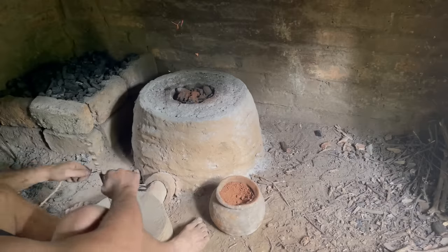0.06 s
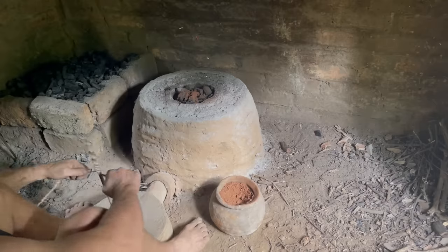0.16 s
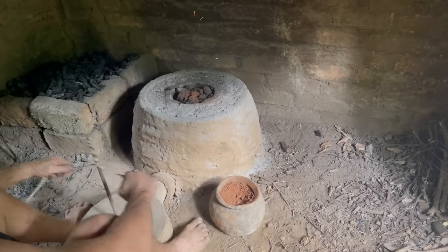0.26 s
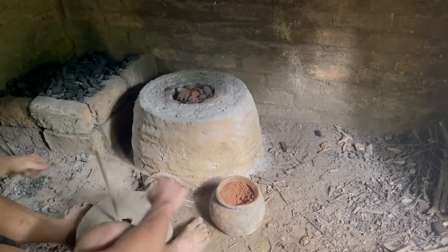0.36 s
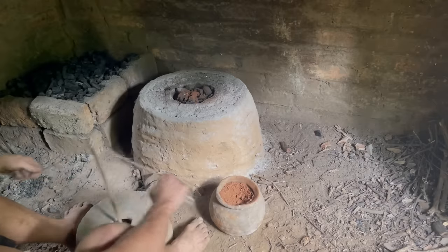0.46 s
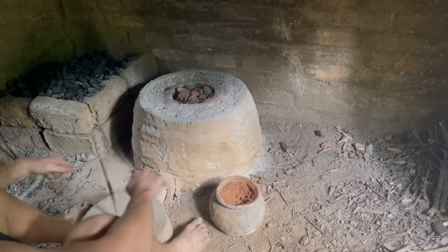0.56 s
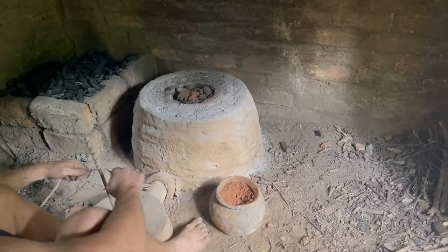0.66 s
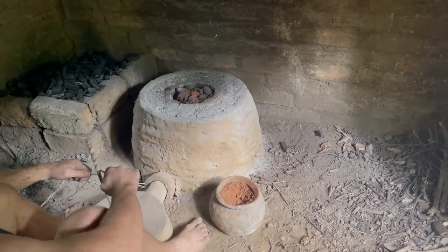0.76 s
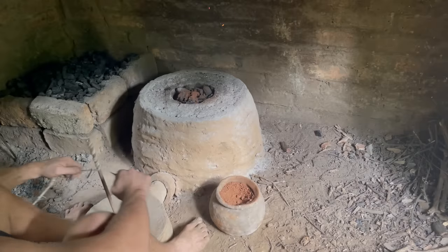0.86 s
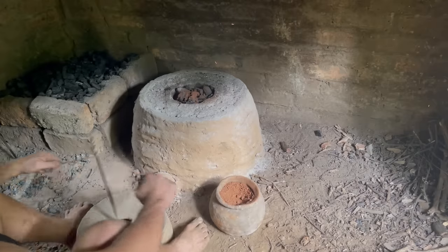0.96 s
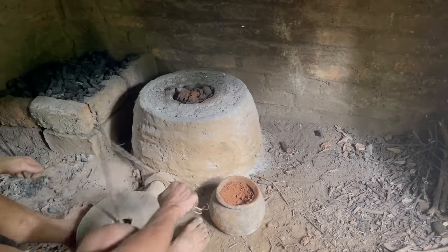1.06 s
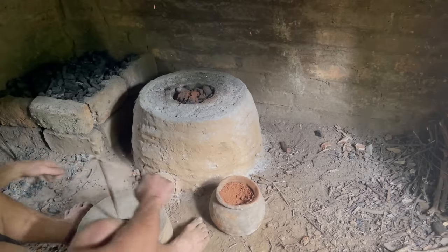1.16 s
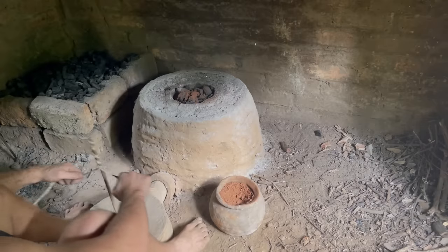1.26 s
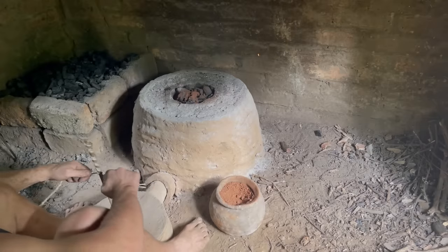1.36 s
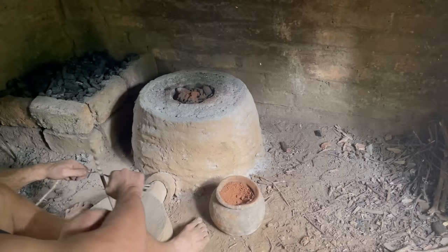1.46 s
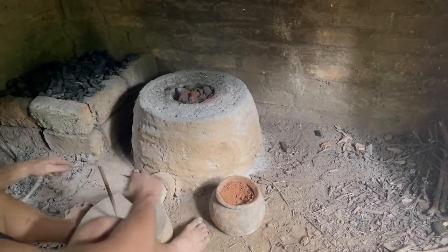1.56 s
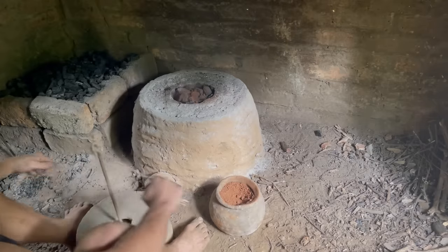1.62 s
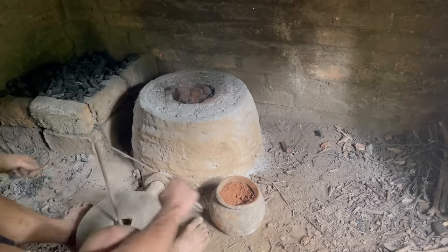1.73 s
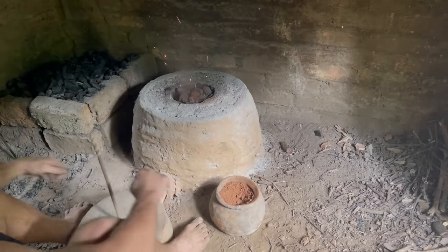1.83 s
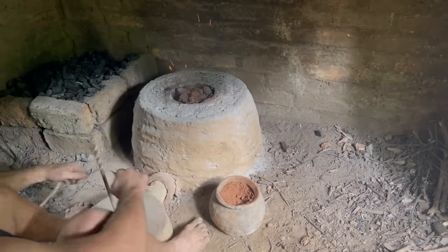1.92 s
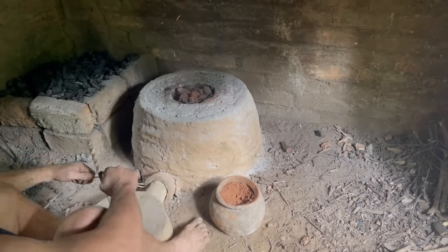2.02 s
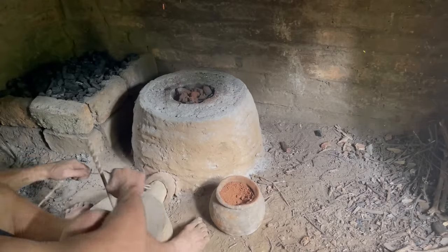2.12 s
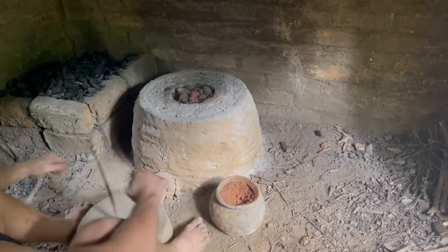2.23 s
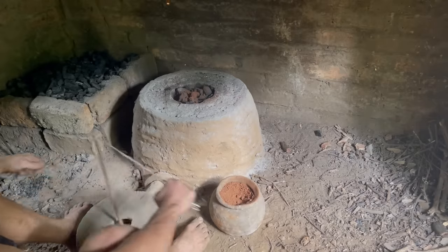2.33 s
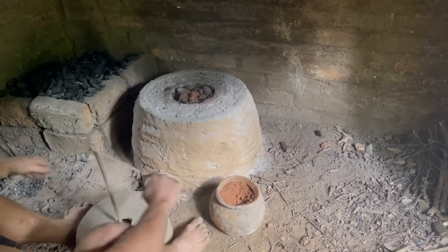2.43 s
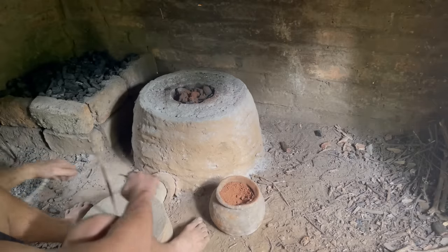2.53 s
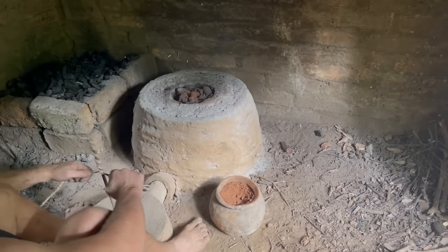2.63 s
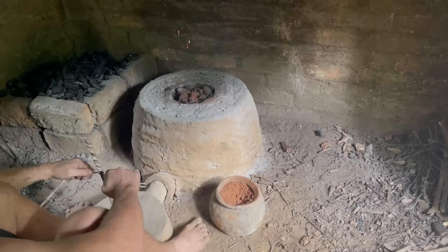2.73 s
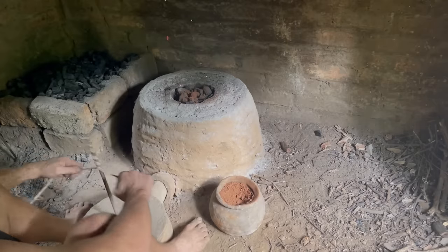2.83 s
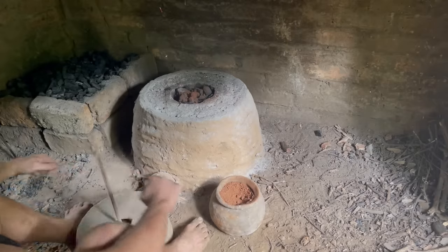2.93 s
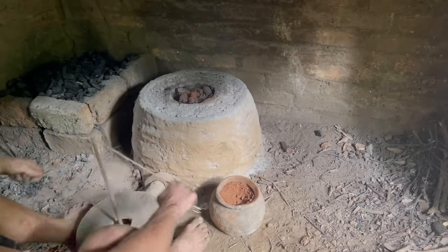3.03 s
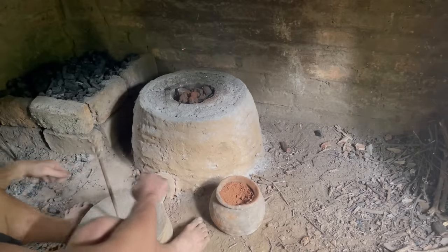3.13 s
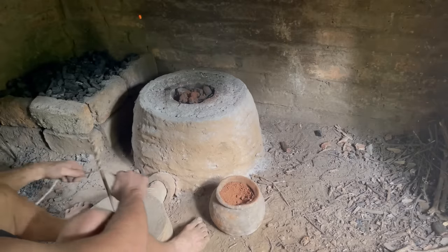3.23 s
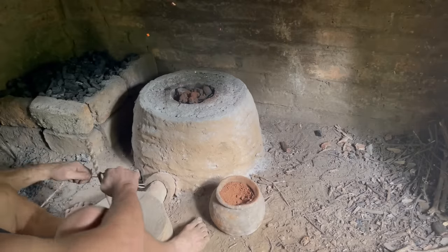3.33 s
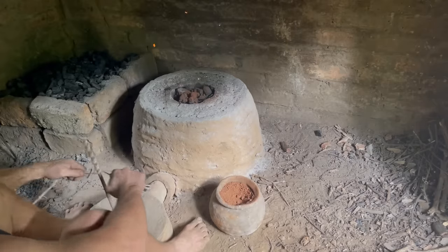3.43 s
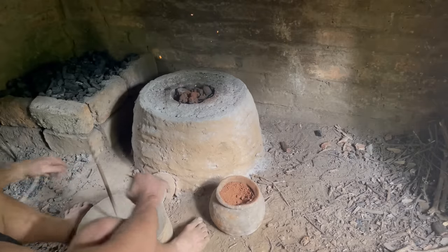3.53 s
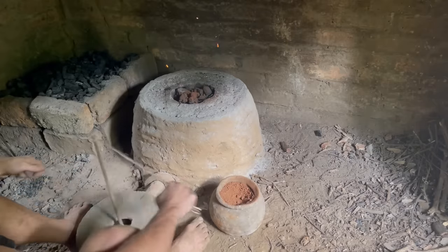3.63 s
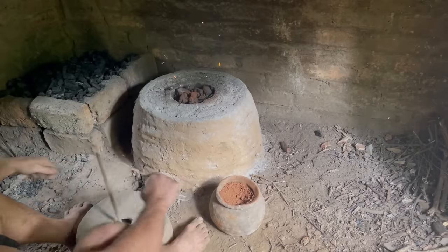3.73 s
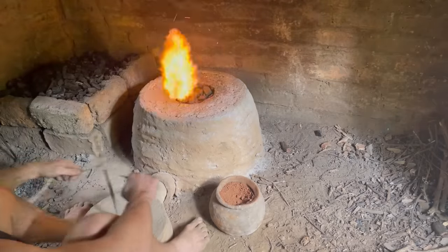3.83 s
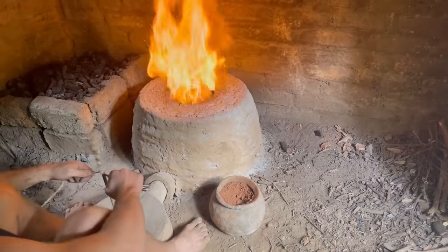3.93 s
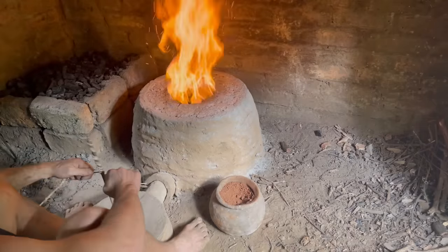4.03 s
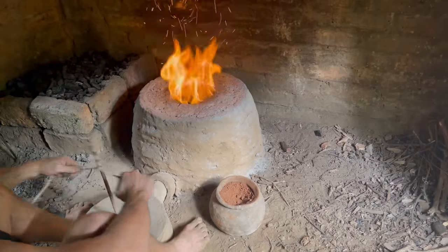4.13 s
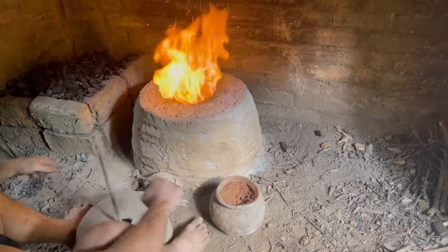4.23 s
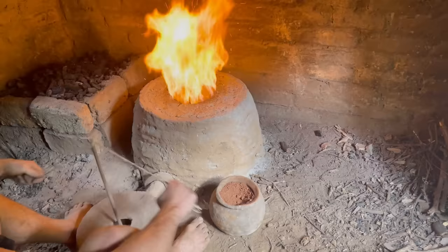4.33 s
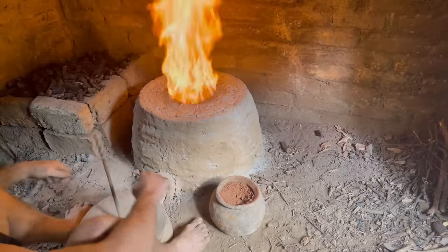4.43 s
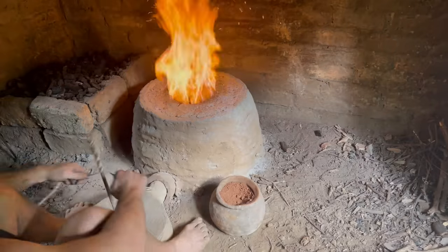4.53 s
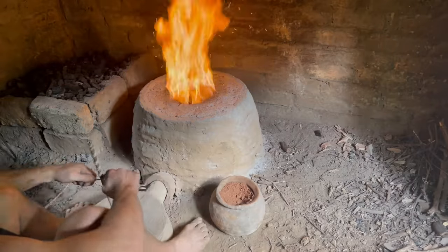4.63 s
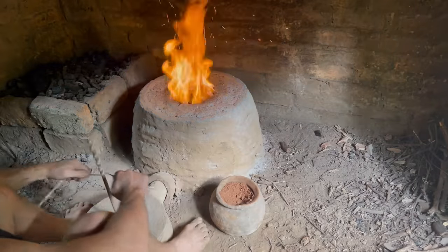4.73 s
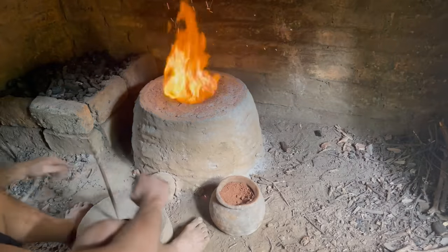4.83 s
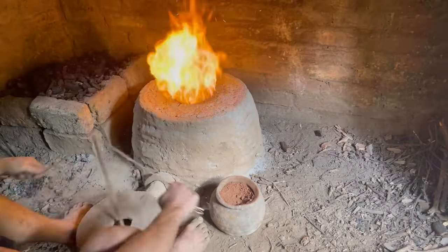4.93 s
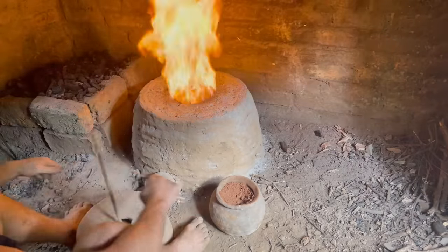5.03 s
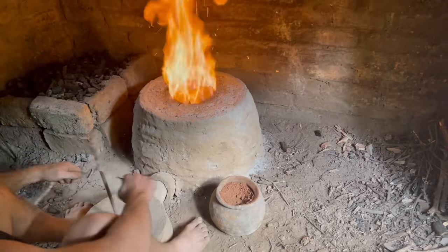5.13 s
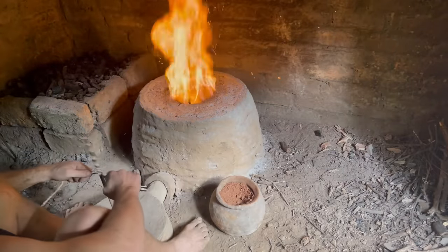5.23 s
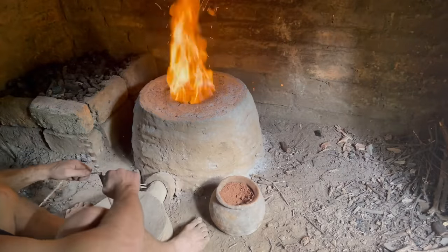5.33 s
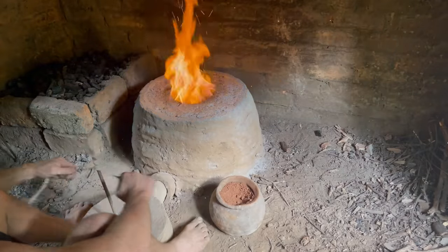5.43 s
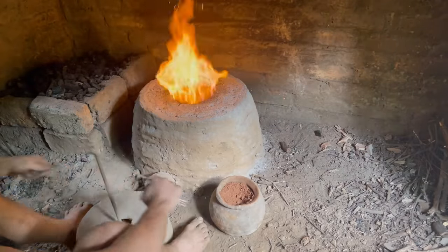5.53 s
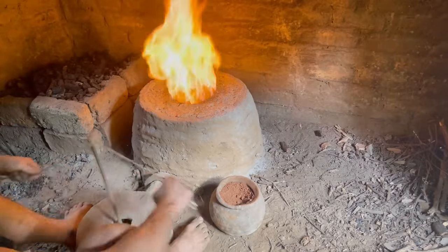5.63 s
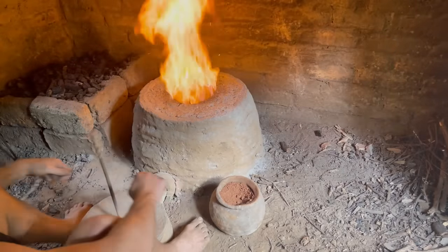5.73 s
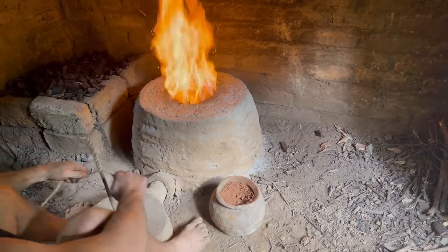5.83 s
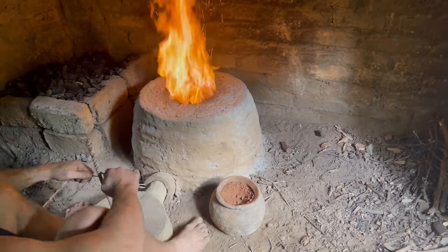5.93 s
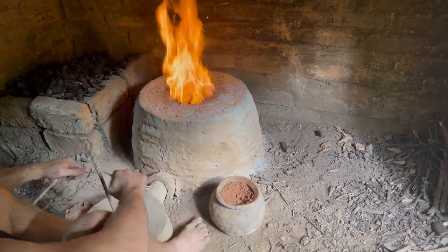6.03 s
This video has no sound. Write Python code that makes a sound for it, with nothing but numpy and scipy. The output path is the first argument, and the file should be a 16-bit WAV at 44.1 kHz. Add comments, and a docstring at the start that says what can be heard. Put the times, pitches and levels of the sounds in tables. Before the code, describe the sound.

Steady pumping of air through a hot coal bed: whoosh, fade, click, whoosh again. The low end hums and booms in the furnace hollow, the middle roars with turbulence, and the top hisses with tiny sparks crackling. Short muffled puffs and bright coal ticks fall irregularly, and a few faint airy whistles glide by. Recorded nearby in stereo inside a small hut, with a very quiet hush in the gaps.

```python
"""A low boom and a roar die away as a blower stroke ends, then stroke follows stroke.
A cord-driven blower feeds a charcoal furnace in a brick hut, a metre or two from the microphone.
Shaped noise booms in the furnace, roars through the coal and hisses at the nozzle; short filtered bursts
make the clicks of the valve flap, the puffs of gas and the ticks of the coals. Gliding bands of noise
whistle faintly, and a steady, faint outdoor hush stays between the strokes."""
import sys
import numpy as np
from scipy import signal
from scipy.fft import rfft, irfft, next_fast_len
from scipy.io import wavfile
from scipy.ndimage import uniform_filter1d

SR = 44100
rng = np.random.default_rng(int(sys.argv[2]) if len(sys.argv) > 2 else 0)


def dump_mix(stems):
    """Bounce the given channels to the path in sys.argv[1] as a 16-bit WAV at rate SR."""
    frames = np.atleast_2d(stems).T  # one column per channel
    limited = np.clip(frames, -1, 1)  # hard clip at full scale
    pcm = np.round(limited * 32767).astype(np.int16)
    wavfile.write(sys.argv[1], SR, pcm)


N = 267554  # samples, about 6.07 s


def undb(db):
    """Decibels to an amplitude factor."""
    return 10 ** (np.asarray(db) / 20)


def unit(x):
    """Scale to an RMS of 1 over all channels."""
    return x / np.sqrt(np.mean(x ** 2))


def over_hz(table):
    """A (Hz, value) table read at every FFT bin, straight on a log axis."""
    hz, value = np.transpose(table)
    bins_hz = np.arange(N // 2 + 1) * SR / N
    return np.interp(np.log(bins_hz + 1), np.log(hz + 1), value)


def resonances(modes):
    """Gain at every FFT bin of broad resonances driven by unrelated eddies, each with steep skirts."""
    f = np.arange(N // 2 + 1) * SR / N + 1  # the 1 keeps the division below finite
    power = 0
    for hz, width, db in modes:
        detuning = (f - hz * hz / f) / width
        power = power + undb(db) ** 2 / (1 + detuning ** 2) ** 2
    return np.sqrt(power)


def walk(rate):
    """A wandering level: random steps held 1 / rate s, then smoothed twice over the same time."""
    hold = int(SR / rate)
    steps = np.repeat(rng.standard_normal(N // hold + 1), hold)
    return 0.9 * uniform_filter1d(uniform_filter1d(steps, hold), hold)[:N]


def air(gain):
    """Stereo noise of a given colour: a shared and an opposed part set how alike the two sides are."""
    # Each row: frequency in Hz, left-right likeness from 0 to 1.
    likeness = [(40, .999), (90, 1), (130, 0.91), (260, 0.45), (600, 1), (950, 0.2), (1300, 0.74),
                (1650, 0.5), (3000, 0.72), (7000, 0.52), (8600, 1), (10300, 1), (12500, 0.6)]
    like = np.clip(over_hz(likeness), 0, 1)
    mid, side = (rfft(rng.standard_normal(N)) * gain for _ in range(2))
    opposed = side * np.sqrt(1 - like) * np.array([[1], [-1]])
    return unit(irfft(mid * np.sqrt(1 + like) + opposed, N))


def even(x, depth):
    """Soften the chance swells of a narrow noise by dividing by a power of its envelope."""
    envelope = np.abs(signal.hilbert(x.mean(axis=0), next_fast_len(N)))[:N]
    return unit(x / (envelope + 0.37) ** depth)


def ring(hz, t60, size):
    """A decaying sine, as one mode of a struck body; t60 in seconds."""
    t = np.arange(size) / SR
    return np.sin(2 * np.pi * hz * t) * undb(-60 * t / t60)


def burst(hz, width, t60, tail_db, order=2, size=4000):
    """A sharp crack with two early echoes and the noisy tail that the walls return, in one band; peak 1."""
    t = np.arange(size) / SR
    one, left, right = rng.standard_normal((3, size))
    tail = (one + 0.55 * np.array([left, right])) * undb(tail_db - 60 * t / max(t60, .005))
    raw = tail * np.minimum(t / 0.00065, 1)  # the tail fades in over 0.65 ms
    raw[:, [30, 42, 70]] += [1, -.8, .5]  # crack, then echoes 12 and 40 samples later
    edges = np.clip([hz - width / 2, hz + width / 2], 200, 15000)
    band = signal.sosfilt(signal.butter(order, edges, "bandpass", fs=SR, output="sos"), raw)
    return band / np.abs(band).max()


def add(track, s, sound):
    """Mix a short sound into the track at time s."""
    i = int(s * SR)
    track[:, i:i + sound.shape[-1]] += sound[..., :N - i]


def strokes():
    """Gains of roar, upper roar, hiss, hollow tone and deep rumble: one shape, played for every stroke."""
    # Blower strokes. Each row: onset in seconds, length in seconds, then gains in dB of roar,
    # upper roar, hiss and boom.
    pulls = [(-.345, 0.66, -1.5, -1.3, 0, 3.5), (0.306, 0.62, 1, 0, -0.7, 0.5),
             (0.948, 0.64, -1, 1.5, -0.5, 1.2), (1.583, .65, 0.2, -1.2, 0.3, 0.5),
             (2.244, 0.65, -0.8, 0.4, 0.1, 1), (2.907, 0.64, 0.2, 0.1, -0.6, -0.3),
             (3.546, 0.62, 0.6, 1, 0.7, 2.1), (4.192, 0.63, 1, -0.1, -0.7, -0.6),
             (4.836, 0.64, 0.2, 0, 0.1, 0.8), (5.49, 0.65, -0.2, -0.4, -0.7, -2.4),
             (6.17, .65, 0.1, 0.1, 6.5, -6)]
    # Rise, hold and decay of a stroke ahead of its own gains. Each row: time from onset in stroke lengths,
    # then levels in dB of roar, upper roar, hiss, hollow tone and deep rumble.
    stroke_shape = [(-.3, -88, -95, -83, -60, -60), (-.12, -62.5, -73, -62, -65, -52),
                    (-.04, -50.5, -66, -58, -39.5, -52), (0.029, -40, -48, -52.5, -27, -28.5),
                    (0.172, -33.5, -43, -48, -24, -38), (.38, -36, -46, -56, -25, -36),
                    (.6, -44, -55.5, -66, -28.5, -35), (.72, -51, -61.5, -72, -32, -37),
                    (.85, -65, -75.5, -72, -37.5, -38.5), (1.05, -90, -95, -90, -44, -64)]
    t = np.arange(N) / SR
    at, *shape = np.transpose(stroke_shape)
    power = 0
    for s, length, roar_db, upper_db, hiss_db, boom_db in pulls:
        db = [np.interp((t - s) / length, at, level, left=-120, right=-120) for level in shape]
        gains_db = np.array([[roar_db, upper_db, hiss_db, boom_db, boom_db]]).T
        power = power + undb(np.array(db) + gains_db) ** 2
    return np.sqrt(power)


def boom(tone_flow, deep_flow):
    """The furnace hollow hums over a deeper rumble, as resonant noise; their levels shift now and then."""
    # Furnace hollow and deep rumble. Each row: resonance in Hz, width in Hz, relative level in dB.
    hollow = [(71.2, 24, -6.5), (86.2, 16.2, 2.5), (128.6, 53.4, -9), (187.5, 36, -14)]
    rumble = [(49.5, 23.5, 0)]
    # Swells of the boom. Each row: centre in seconds, spread (sigma) in seconds, hollow tone rise in dB,
    # deep rumble rise in dB (a fall where negative).
    swells = [(0.093, 0.047, 1, -9), (0.48, 0.024, 4, -13), (0.644, 0.03, 3, 5), (1.068, 0.023, 4.5, -3),
              (1.194, 0.027, 6.5, 2), (1.708, 0.042, 3.5, -1), (1.83, 0.029, 4.5, -5),
              (1.934, 0.023, 2.5, -4), (2.442, 0.021, 7, 4), (2.668, 0.034, 5, 6), (3.0, 0.021, 4.5, 4),
              (3.148, 0.038, 7, 3), (3.83, 0.054, 5.5, 3), (3.911, 0.028, 1.5, 20.5), (4.485, 0.03, 7.5, 5),
              (5.004, 0.036, 4, 4), (5.623, 0.026, 6.5, 10.5), (5.851, .04, 8, 7)]
    t = np.arange(N) / SR
    tone_db, deep_db = 0, 0
    for s, spread, tone_rise, deep_rise in swells:
        bump = np.exp(-.5 * ((t - s) / spread) ** 2)
        tone_db = tone_db + tone_rise * bump
        deep_db = deep_db + deep_rise * bump
    tone = even(air(resonances(hollow)), 0.15) * tone_flow * undb(tone_db)
    deep = even(air(resonances(rumble)), 0.31) * deep_flow * undb(deep_db)
    return tone + deep


def roar(roar_flow, upper_flow, gust):
    """Air roars through coal bed and pipe: noise in their resonances, shaken in level by turbulence."""
    # Coal bed and pipe, low and upper. Each row: resonance in Hz, width in Hz, relative level in dB.
    pipe = [(207.4, 79, 3.5), (380, 210, -2), (592, 247, -1)]
    upper_pipe = [(887, 135, 1), (1106, 196, 1.5), (1278, 70, 5.5), (1483, 254, -1.5), (1846, 760, -8.5),
                  (2310, 270, -13), (2860, 680, -14)]
    low = air(resonances(pipe)) * roar_flow * undb(1.8 * gust + 1.4 * walk(70))
    upper = air(resonances(upper_pipe)) * upper_flow * undb(1.1 * gust + 1.14 * walk(50))
    return low + upper


def hiss(flow, gust):
    """The jet at the nozzle hisses: coloured noise that follows the flow and its gusts."""
    # Colour of the hiss. Each row: frequency in Hz, relative level in dB per Hz.
    jet_colour = [(1500, 1.5), (2500, -2), (4000, -0.5), (6300, -2.5), (8500, 2), (10300, 0.5), (11200, 6),
                  (12000, -9), (13000, -28)]
    colour = undb(over_hz([(600, -38)] + jet_colour))
    return air(colour) * flow * undb(1.5 * gust + 1.95 * walk(35))


def crackle(flow):
    """The draught makes the coals crackle faintly: random sparks, in step with the hiss."""
    struck = rng.random(N) < 50 / SR  # about 50 a second
    strength = undb(3.5 + 2.0 * rng.exponential(size=N)) * rng.standard_normal(N)
    sparks = struck * flow * strength
    snap = burst(8700, 5100, 0.049, tail_db=-9.0, size=900)
    return signal.fftconvolve(sparks[None], snap, axes=1)[:, :N]


def puffs():
    """Sudden puffs of gas in the coal bed: short bursts of low-pitched noise."""
    # Each row: start in seconds, peak in dB, centre in Hz, tail t60 in seconds.
    gas_puffs = [(0.418, -22, 684, 0.16), (0.586, -26, 423, 0.089), (1.109, -23, 446, 0.098),
                 (1.704, -20.5, 620, 0.11), (1.799, -30, 437, 0.026), (1.825, -25.5, 611, 0.21),
                 (2.469, -29, 573, 0.068), (3.06, -25, 630, 0.11), (3.132, -21.5, 620, 0.097),
                 (3.632, -31, 547, 0.15), (3.849, -23.5, 560, 0.36), (4.275, -24, 619, 0.16),
                 (4.358, -19.5, 432, 0.028), (5.567, -23.5, 580, 0.073), (5.652, -27, 638, 0.14),
                 (5.721, -23, 436, 0.12)]
    out = np.zeros((2, N))
    for s, db, hz, t60 in gas_puffs:
        add(out, s, undb(db) * burst(hz, 463, t60, tail_db=-13.5, order=3))
    return out


def blower(roar_flow, upper_flow, hiss_flow):
    """Roar, hiss and crackle follow the flow, the first two under shared gusts; puffs come on top."""
    gust = walk(24.96)
    blast = roar(roar_flow, upper_flow, gust) + hiss(hiss_flow, gust)
    return blast + crackle(hiss_flow) + puffs()


def flap():
    """Each valve flap contact cracks in the treble and knocks lower down; the knock rings short modes."""
    # Flap contacts. Each row: start in seconds, crack peak in dB, knock over crack in dB,
    # gain of the ringing in the knock in dB, tail t60 in seconds, tail gain under the crack in dB.
    contacts = [(0.104, -32.5, -5.5, -35, 0.072, -19), (0.7635, -31, -13.5, -28, 0.092, -19),
                (1.3746, -32.5, -3.5, -38, 0.11, -19), (2.0403, -27.5, -6, -36.5, 0.11, -26),
                (2.6842, -28, -11, -30.5, 0.08, -21), (3.3288, -29, -4.5, -33, 0.07, -14.5),
                (3.3447, -25, -1.5, -32.5, 0.1, -25.5), (4.6105, -31, -1.5, -37, 0.069, -17),
                (4.6154, -24.5, -20, -23, 0.079, -29), (4.6209, -27, -2, -34.5, 0.1, -22),
                (5.2806, -30.5, -5.5, -30.5, 0.09, -19.5), (5.9341, -23.5, -13, -27, 0.092, -21.5),
                (5.946, -30, 2, -35.5, 0.1, -24.5)]
    # Short ringing modes, ahead of a chance spread. Each row: frequency in Hz, level in dB, t60 in seconds.
    flap_modes = [(1888, 6, 0.049), (1978, 7, 0.06), (2833, 3, 0.05), (3530, -12, 0.033), (3756, 2, 0.078),
                  (4520, -10, 0.034), (4760, 3, 0.03), (5920, -16, 0.036)]
    out = np.zeros((2, N))
    for s, db, knock_db, ring_db, t60, tail_db in contacts:
        modes = 0
        for hz, mode_db, mode_t60 in flap_modes:
            level_chance, pitch_chance = rng.standard_normal(2)
            mode = ring(hz * (1 + 0.0094 * pitch_chance), mode_t60, size=4000)
            modes = modes + undb(mode_db + 1.1 * level_chance) * mode
        knock = burst(4380, 3270, t60, tail_db)
        rung = signal.fftconvolve(knock, modes[None], axes=1)[:, :4000]
        add(out, s, undb(db) * burst(8360, 5050, t60, tail_db))
        add(out, s, undb(db + knock_db) * (knock + undb(ring_db) * rung))
    return out


def coals():
    """The louder ticks of the coals: single wide-band cracks in the treble."""
    # Each row: start in seconds, peak in dB, centre in Hz, tail t60 in seconds.
    ticks = [(0.2766, -42, 8100, 0.048), (0.3333, -22, 9900, 0.076), (0.666, -40, 8200, 0.1),
             (0.864, -37.5, 9200, 0.086), (0.9527, -35, 8750, 0.032), (1.3184, -44, 8570, 0.044),
             (1.756, -35, 9500, 0.05), (2.193, -35.5, 7810, 0.2), (2.5887, -29, 10200, 0.064),
             (2.9158, -40, 8540, 0.04), (2.939, -29.5, 9900, 0.064), (3.4263, -45, 8600, 0.04),
             (3.925, -45, 9500, 0.04), (4.0578, -44.5, 8930, 0.078), (4.151, -44, 8600, 0.04),
             (5.5009, -38, 8050, 0.043), (5.5273, -31, 9300, 0.1), (5.7283, -38, 9200, 0.048),
             (5.8698, -37.5, 7600, 0.032)]
    out = np.zeros((2, N))
    for s, db, hz, t60 in ticks:
        add(out, s, undb(db) * burst(hz, 6000, t60, tail_db=-19))
    return out


def whistles():
    """Faint airy whistles: bands of noise around a gliding pitch, fading in and out."""
    # Each row: start in seconds, end in seconds, start pitch in Hz, end pitch in Hz, rough width in Hz,
    # level in dB ahead of the fades.
    glides = [(2.064, 2.135, 1950, 1610, 40, -67), (2.725, 2.885, 1570, 1580, 30, -76),
              (3.848, 4.063, 4800, 4900, 70, -74), (3.947, 4.09, 2440, 2310, 60, -70),
              (4.616, 4.925, 3380, 2990, 900, -67.5), (5.301, 5.548, 2820, 3060, 990, -67)]
    out = np.zeros((2, N))
    for start, end, hz0, hz1, width, db in glides:
        size = int((end - start) * SR)
        phase = 2 * np.pi * np.cumsum(np.linspace(hz0, hz1, size)) / SR
        # slow noise on cosine and sine widens the tone into a band
        waver = uniform_filter1d(rng.standard_normal((2, 2, size)), int(SR / width))
        band = unit(waver[0] * np.cos(phase) + waver[1] * np.sin(phase))
        add(out, start, undb(db) * band * signal.windows.tukey(size, .4))
    return out


def hush():
    """The faint outdoor hush: coloured noise whose level drifts slowly."""
    # Each row: frequency in Hz, relative level in dB per Hz.
    hush_colour = [(40, 17), (90, 3), (200, -4), (500, -20), (1000, -40), (3000, -28), (5500, -64),
                   (8500, -23), (11200, -43), (13000, -58)]
    return air(undb(over_hz(hush_colour))) * undb(-49.5 + 1.4 * walk(2.3))


def scene():
    """The strokes drive boom and blower; flap, ticks, whistles and hush are laid beside them."""
    roar_flow, upper_flow, hiss_flow, tone_flow, deep_flow = strokes()
    blown = boom(tone_flow, deep_flow) + blower(roar_flow, upper_flow, hiss_flow)
    return blown + flap() + coals() + whistles() + hush()


def record(dry):
    """Two microphone ports differ in level and phase; the deepest bass and the top are cut."""
    # Level balance. Each row: frequency in Hz, left minus right in dB.
    balance_db = [(60, -1.5), (110, 3), (200, -1.5), (350, 3.5), (640, 0), (1160, 1.5), (2100, 3),
                  (3790, 4), (6860, 2.5), (12400, -1)]
    # Phase between the ports. Each row: frequency in Hz, lead of the left port in radians.
    port_lead = [(30, 0), (260, .4), (1300, .15), (1750, -.6), (2700, .9), (4300, .4), (6600, .1),
                 (7700, 1.), (8600, 0), (10300, -3.2), (12060, -6.3), (13400, -9)]
    # half of each difference goes to the left, the opposite half to the right
    half = undb(over_hz(balance_db) / 2) * np.exp(.5j * over_hz(port_lead))
    ports = irfft(rfft(dry) * np.array([half, 1 / half]), N)
    ports = signal.sosfilt(signal.butter(4, 37, "highpass", fs=SR, output="sos"), ports)
    return signal.sosfilt(signal.ellip(8, .2, 70, 13000, fs=SR, output="sos"), ports)


dry = scene()
out = record(dry)
dump_mix(out)
```